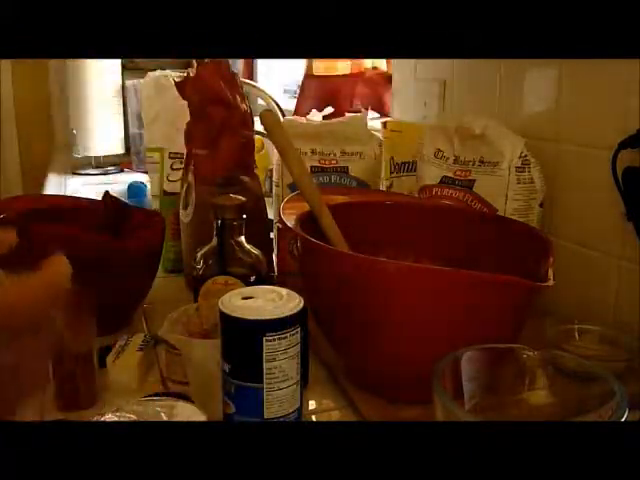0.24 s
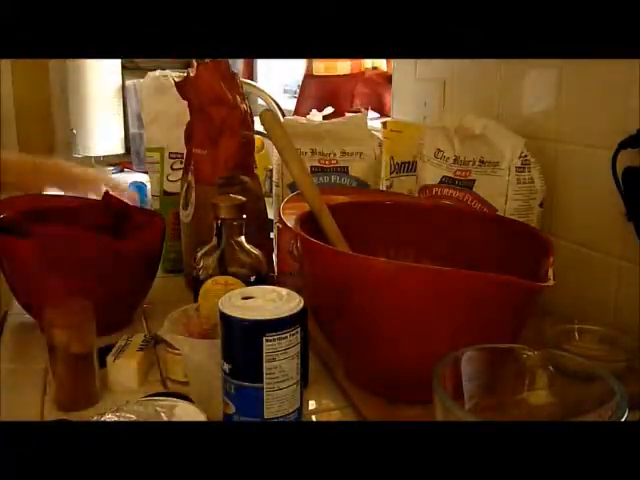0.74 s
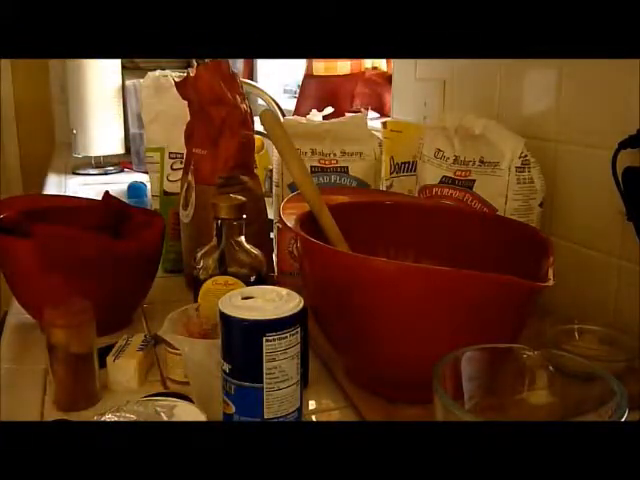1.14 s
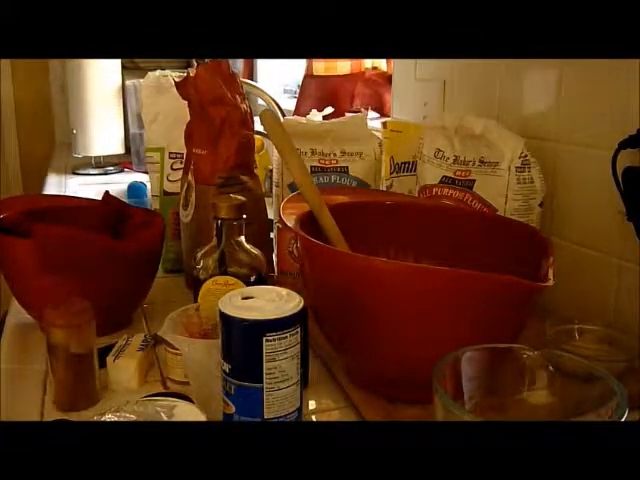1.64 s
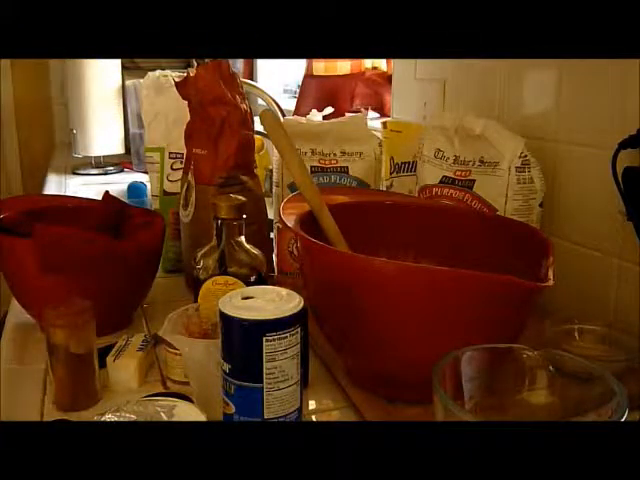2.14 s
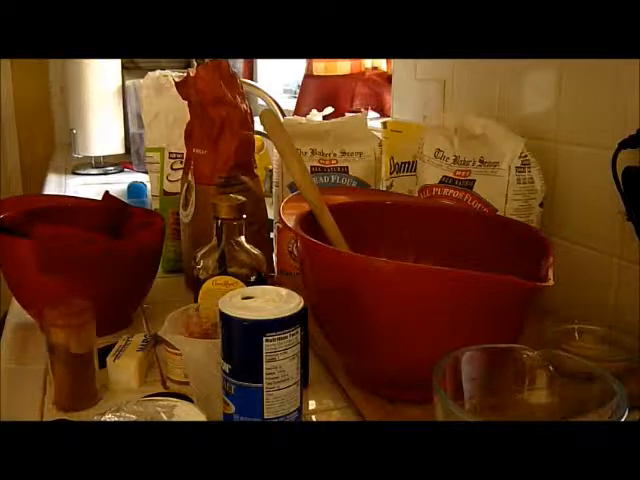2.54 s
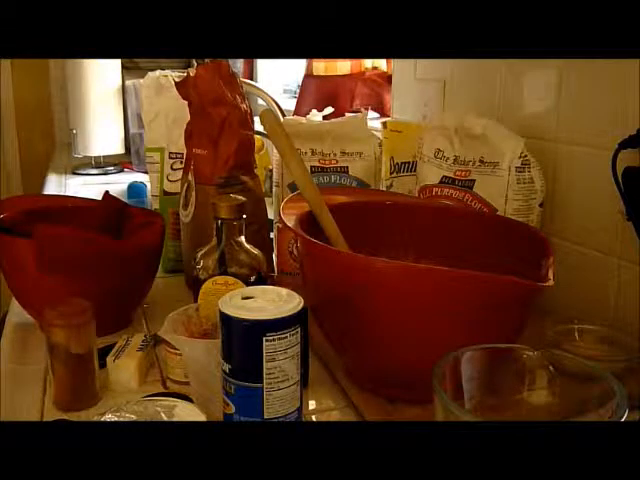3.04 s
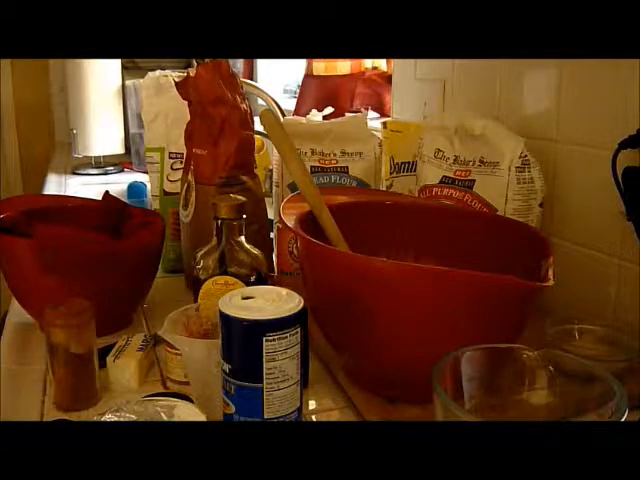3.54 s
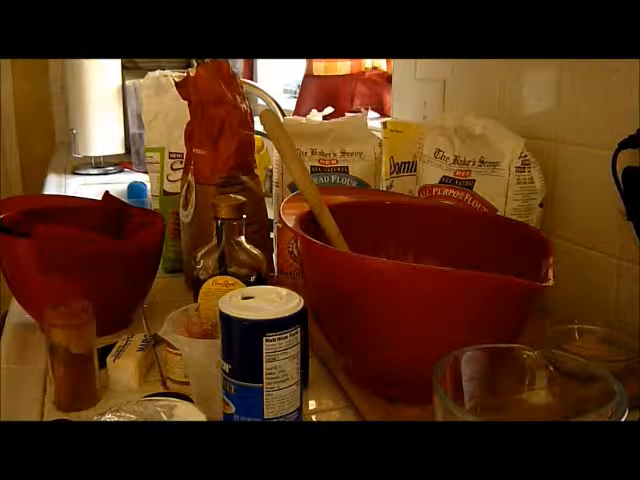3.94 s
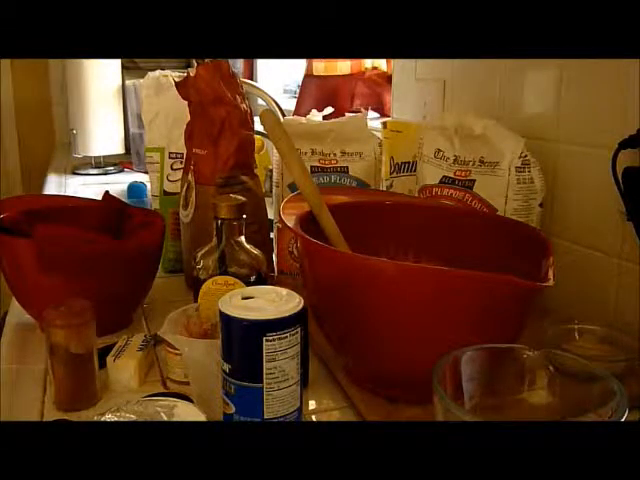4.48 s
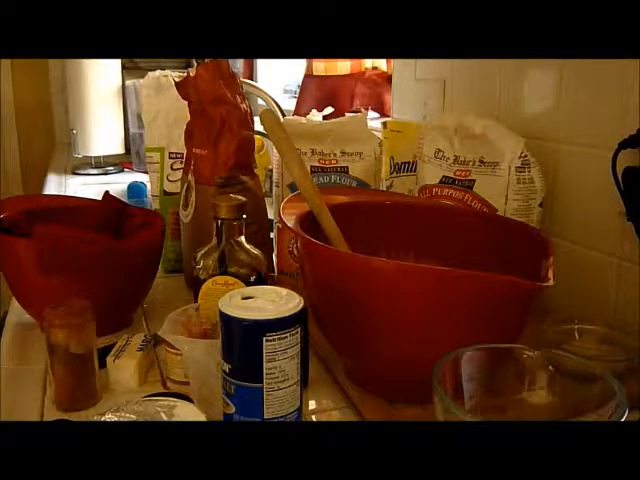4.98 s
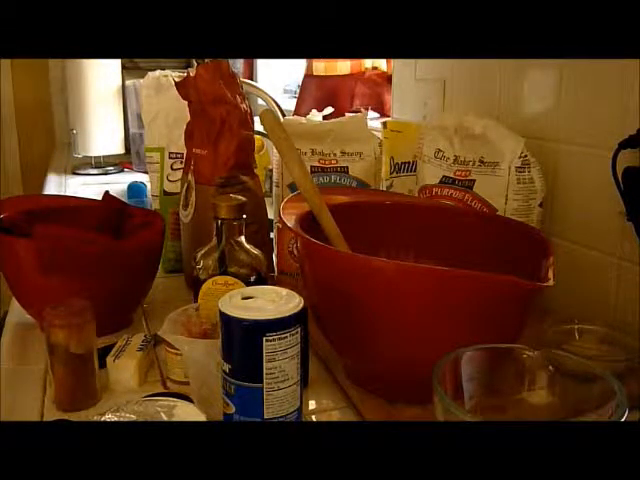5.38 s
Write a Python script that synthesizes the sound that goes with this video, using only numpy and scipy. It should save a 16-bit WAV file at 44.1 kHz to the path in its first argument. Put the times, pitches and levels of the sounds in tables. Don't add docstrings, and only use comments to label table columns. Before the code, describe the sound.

In a small tiled kitchen, a microwave door latch snaps open with a sharp rattling clack. Soft hinge bumps follow, then a bowl knocks the oven wall and the glass turntable is nudged and scraped. After a quiet pause the door slams shut with a hollow metallic thud. The oven is some way off, with short hard-walled echo; faint ticks and cloth sit near the microphone over steady hiss and fridge hum.

```python
import sys
import numpy as np
from scipy import signal
from scipy.fft import rfft, irfft
from scipy.io import wavfile
from scipy.ndimage import uniform_filter1d

SR = 44100
rng = np.random.default_rng(int(sys.argv[2]) if len(sys.argv) > 2 else 0)


def bounce(signal):
    frames = np.transpose(np.atleast_2d(signal))
    limited = np.clip(frames, -1, 1)
    pcm = np.round(limited * 32767).astype(np.int16)
    wavfile.write(sys.argv[1], SR, pcm)


def makeup_ratio(level_db):
    decades = np.asarray(level_db, float) / 20
    return 10 ** decades


N = 247489
TIME = np.arange(N) / SR
SNAP_RISE, KNOCK_RISE, RUB_RISE = 0.13, 0.25, 0.47

# t/s, level/dB, die-away/ms
LATCH_HITS = [
    (.679, -10.5, 6.6),
    (.686, -10.5, 22.5),
    (.702, -24, 25),
    (.728, -20.5, 6.0),
    (.761, -18, 24),
    (.7665, -16, 8.4),
    (.782, -22.5, 32),
]
# f/Hz, level/dB (per Hz)
LATCH_COLOUR = [(60, -70), (125, -48), (170, -22), (400, -46), (1200, -20.5), (1900, -5), (2180, -23.5),
                (2900, 2.5), (3330, -13.5), (4300, -9.5), (4900, -20.5), (7400, -23), (8000, -15),
                (10000, -67.5)]
# f/Hz, width/Hz, level/dB
LATCH_PEAKS = [(1760, 260, -13), (3166, 140, -4.5), (4200, 280, -13.5)]
# f/Hz, level/dB (per Hz)
SPRING_COLOUR = [(110, -61), (200, -40), (500, -10), (1200, -25.5), (1800, -4.5), (2800, -2.5),
                 (4300, -4.5), (5000, -18.5), (8000, -15), (10000, -78)]
# f/Hz, width/Hz, level/dB
SPRING_PEAKS = [(1600, 120, -7), (1880, 160, -1), (2680, 260, -1), (3150, 240, -4), (3850, 200, -3),
                (4400, 300, -6)]


def latch():
    spring_return_s = 0.75
    force = rattle(LATCH_HITS, SNAP_RISE, 7000, 0.71, -5.5)
    hooks_free = force * (TIME < spring_return_s)
    lever_back = force * (TIME >= spring_return_s)
    snap = signal.oaconvolve(hooks_free, body(LATCH_COLOUR, LATCH_PEAKS, -2.0))
    back = signal.oaconvolve(lever_back, body(SPRING_COLOUR, SPRING_PEAKS, -4.4))
    return (snap + back)[:N]


# t/s, level/dB, die-away/ms
HOOK_SLIDE = [
    (4.966, -18, 25.4),
    (4.999, -22, 25.2),
]
# f/Hz, level/dB (per Hz)
HOOK_COLOUR = [(60, -51), (110, -13), (300, -11), (520, -2), (900, -8.5), (1300, -6), (2000, -12),
               (3800, -14), (6800, -22.5), (8000, -23), (10000, -81)]
# t/s, level/dB, die-away/ms
DOOR_SLAM = [
    (5.0195, -5.5, 5.5),
    (5.025, -7, 7.5),
    (5.036, -16.5, 21),
    (5.065, -20.5, 54),
]
# f/Hz, level/dB (per Hz)
SLAM_COLOUR = [(40, -16.5), (120, -31), (200, -2), (300, -1), (450, -7), (650, -2), (1000, -10.5),
               (1700, -12), (3000, -18.5), (4900, -22), (6500, -25.5), (8000, -30.5), (10000, -83.5)]
# f/Hz, width/Hz, level/dB
SLAM_PEAKS = [(141, 10.4, 8), (225, 7.7, -5), (275, 12, -12), (312.7, 16, -3), (324, 29, -1),
              (413, 13, 5.5), (443, 4.6, 6), (504, 18, 1.5), (554, 11, 3), (633, 35, 6), (794, 17, -12),
              (871, 23, 1), (1080, 22, -13)]


def door_slam():
    hooks = struck(HOOK_SLIDE, KNOCK_RISE, coloured(HOOK_COLOUR), 8000, 0.94)
    slam = struck(DOOR_SLAM, SNAP_RISE, body(SLAM_COLOUR, SLAM_PEAKS, -6.0), 12000, 0.2)
    return hooks + slam


# t/s, level/dB, die-away/ms
DOOR_SWING = [
    (2.025, -37, 25.0),
    (2.362, -34, 29.8),
]
# f/Hz, level/dB (per Hz)
SWING_COLOUR = [(35, -39), (60, -13), (361, 0.5), (574, -7), (665, -38), (831, -24), (5000, -27.5),
                (6500, -60), (11000, -120)]
# f/Hz, width/Hz, level/dB
SWING_PEAKS = [(374, 59, -6), (850, 23, -14)]
# t/s, level/dB, die-away/ms
DOOR_STOP = [
    (2.085, -30.5, 22),
    (2.13, -40, 9.1),
]
# f/Hz, level/dB (per Hz)
STOP_COLOUR = [(47, -34), (80, 2), (196, -1), (241, -25), (308, -12), (663, -6.5), (1180, -21), (1450, -20),
               (7000, -29.5), (9100, -61), (15400, -120)]
# f/Hz, width/Hz, level/dB
STOP_PEAKS = [(420, 22, -18), (682, 140, 1), (2340, 81, -23), (4240, 35, -26), (4700, 47, -19)]


def door_swing():
    swing = struck(DOOR_SWING, KNOCK_RISE, body(SWING_COLOUR, SWING_PEAKS, -7.0), 9000, 1.2)
    stop = struck(DOOR_STOP, KNOCK_RISE, body(STOP_COLOUR, STOP_PEAKS, 1.5), 4900, 1.5)
    return swing + stop


# t/s, level/dB, die-away/ms
BOWL_KNOCKS = [
    (2.431, -31.5, 16),
    (2.444, -23.5, 38),
    (2.464, -19.5, 20.5),
    (2.482, -18, 18),
    (2.506, -23.5, 24),
]
# f/Hz, level/dB (per Hz)
BOWL_COLOUR = [(60, -39.5), (120, -8), (350, -16), (520, -4.5), (950, -12.5), (1400, -7.5), (1950, -12.5),
               (2700, -17.5), (4500, -22.5), (8000, -26), (10000, -72)]
# f/Hz, width/Hz, level/dB
BOWL_PEAKS = [(522, 60, -5), (678, 50, -8), (850, 60, -7), (1180, 80, -7), (1400, 90, 4), (2660, 200, -8),
              (4480, 200, -17)]
# t/s, level/dB, die-away/ms
BOWL_TAP = [
    (3.9115, -34, 7.2),
    (3.92, -36.5, 33),
]
# f/Hz, level/dB (per Hz)
TAP_COLOUR = [(180, -36), (300, -22), (459, -15), (852, -4.5), (2450, -12.5), (4370, -11), (7170, -17.5),
              (8000, -16), (10400, -57), (17600, -120)]
# t/s, level/dB, die-away/ms
BOWL_SETTLE = [
    (2.775, -38, 12),
    (2.845, -36.5, 22),
]
# f/Hz, level/dB (per Hz)
SETTLE_COLOUR = [(120, -24), (200, -1), (635, 5), (1150, -9), (1400, -9), (1610, -8), (3000, -21),
                 (3900, -49), (6600, -120)]


def bowl():
    knocks = struck(BOWL_KNOCKS, KNOCK_RISE, body(BOWL_COLOUR, BOWL_PEAKS, -11.0), 10000, 0.55)
    tap = struck(BOWL_TAP, SNAP_RISE, coloured(TAP_COLOUR), 9000, 1.0)
    settle = struck(BOWL_SETTLE, RUB_RISE, coloured(SETTLE_COLOUR), 5000, 3.4)
    return knocks + tap + settle


# t/s, level/dB, die-away/ms
PLATE_NUDGES = [
    (3.312, -30.5, 31),
    (3.40, -52, 8.9),
]
# f/Hz, level/dB (per Hz)
NUDGE_COLOUR = [(71, -48), (120, -15), (402, 4.5), (692, -4.5), (1110, -3), (2060, -33.5), (5810, -33),
                (7000, -39), (9100, -62), (15400, -120)]
# f/Hz, width/Hz, level/dB
NUDGE_PEAKS = [(410, 23, 0), (1096, 23, -0.5), (1230, 70, -2), (1700, 26, -14), (2440, 57, -16),
               (2890, 44, -14.5)]
# t/s, level/dB, die-away/ms
PLATE_SHIFT = [
    (3.49, -31.5, 28),
    (3.522, -42, 11.5),
]
# f/Hz, level/dB (per Hz)
SHIFT_COLOUR = [(88, -47), (150, -23), (278, -20), (403, 6), (574, -28), (1130, -4.5), (6000, -48),
                (7800, -76), (13200, -120)]
# f/Hz, width/Hz, level/dB
SHIFT_PEAKS = [(408, 16, -3), (640, 12, -12.5), (880, 21, -11.5), (1170, 68, -26), (1710, 43, -16),
               (2130, 36, -16), (2835, 47, -17.5)]
# t/s, level/dB, die-away/ms
PLATE_DRAG = [
    (3.66, -37.5, 43),
    (3.705, -25.5, 22.3),
    (3.725, -24.5, 17),
    (3.745, -29, 12),
    (3.77, -20, 11.7),
    (3.812, -39, 10),
]
# f/Hz, level/dB (per Hz)
DRAG_COLOUR = [(120, -61), (200, -14), (396, -11.5), (957, -14), (1090, 6), (1330, -20), (1840, -8),
               (6000, -88), (7800, -81), (13200, -120)]
# f/Hz, width/Hz, level/dB
PLATE_PEAKS = [(403, 8.7, 6.5), (531.5, 6.3, 1.5), (662, 11, -3), (780, 79, 1.5), (1074, 28, -6),
               (1114, 44, 0), (1670, 46, -20), (1830, 18, 2), (2650, 98, -8), (3780, 43, -16.5),
               (3900, 60, -38), (5100, 90, -26)]


def turntable():
    nudge = struck(PLATE_NUDGES, RUB_RISE, body(NUDGE_COLOUR, NUDGE_PEAKS, 3.9), 6000, 2.1)
    shift = struck(PLATE_SHIFT, RUB_RISE, body(SHIFT_COLOUR, SHIFT_PEAKS, 2.1), 7200, 6.6)
    drag = struck(PLATE_DRAG, RUB_RISE, body(DRAG_COLOUR, PLATE_PEAKS, 1.9), 6000, 3.0)
    return nudge + shift + drag


# (t/s, level/dB)
CASE_NOTES = [
    (58, 0.19, [(5.02, -24)]),
    (75, 0.25, [(5.02, -25)]),
    (101.5, 0.28, [(2.025, -40), (2.365, -44), (2.437, -27.5), (5.015, -20)]),
    (174.8, 0.39, [(.679, -31.5), (3.31, -41.5), (5.065, -22)]),
    (276, 0.37, [(2.49, -33)]),
    (322.3, 0.37, [(.765, -37.5), (5.022, -26)]),
    (665, 0.22, [(2.088, -33.5)]),
    (662, .9, [(.83, -38)]),
    (680, .6, [(.86, -43)]),
    (1447, 0.2, [(2.478, -33), (2.56, -29.5)]),
]


def case_ringing():
    return ringing_tones(CASE_NOTES)


# (t/s, level/dB)
GLASS_NOTES = [(402, 0.17, [(3.517, -31.5), (3.735, -32)]), (805, 0.26, [(3.707, -34)]),
               (1560, 0.088, [(.293, -47), (.35, -46)]), (1660, 0.064, [(.324, -44)]),
               (1760, 0.15, [(3.335, -43.5)]), (1885, 0.35, [(3.712, -36.5), (3.76, -49)]),
               (2740, 0.17, [(3.715, -50.5), (3.765, -56)]), (3140, .18, [(3.315, -51), (3.39, -60)]),
               (3760, 0.2, [(3.48, -61), (3.725, -57), (3.77, -51)]), (4770, .12, [(2.088, -62)]),
               (5170, 0.21, [(3.725, -62), (3.77, -61)]), (5640, 0.11, [(3.317, -48)])]


def glass_ringing():
    return ringing_tones(GLASS_NOTES)


# t/s, level/dB
COUNTER_TICKS = [(0.2757, -44.5), (0.2844, -43), (0.3054, -45), (0.3284, -42), (0.4774, -45), (1.264, -48),
                 (1.335, -46), (1.3554, -45), (2.385, -42), (4.998, -26), (5.4705, -48)]
# f/Hz, level/dB (per Hz)
TICK_COLOUR = [(500, -33), (1600, 6), (3500, -2), (7000, 2.5), (9000, -9.5)]
# t/s, level/dB, die-away/ms
SLEEVE_BRUSHES = [
    (.56, -43, 48),
    (1.56, -46, 72),
    (1.84, -44.5, 65),
    (1.97, -45.5, 14),
]
# f/Hz, level/dB (per Hz)
SLEEVE_COLOUR = [(600, -4), (1600, 13.5), (3000, 5.5), (6500, 3.5), (9000, -24)]


def counter():
    tick_ms = 2.5
    hits = [(s, db, tick_ms) for s, db in COUNTER_TICKS]
    ticks = struck(hits, SNAP_RISE, coloured(TICK_COLOUR), 9000, 2.7, trim_db=-3.0)
    sleeves = struck(SLEEVE_BRUSHES, RUB_RISE, coloured(SLEEVE_COLOUR), 11000, 2.7)
    return ticks + sleeves


# f/Hz, time to fall 60 dB/s
KITCHEN_T60 = [(60, 0.75), (180, 0.44), (400, 0.55), (1000, 0.69), (3000, 0.59), (8000, 0.46)]


def kitchen(x):
    t = TIME[:SR]
    edges = 30 * 2 ** np.arange(0, 8.6, 0.5)
    white = rng.standard_normal((2, SR))
    tail = np.zeros(SR)
    for k, (low, high) in enumerate(zip(edges, edges[1:])):
        band = signal.butter(2, [low, high], "band", fs=SR, output="sos")
        t60 = at_hz(KITCHEN_T60, np.sqrt(low * high))
        tail += signal.sosfilt(band, white[k % 2]) * makeup_ratio(-60 * t / t60)
    spectrum = rfft(tail, 2 * SR)
    power = uniform_filter1d(np.abs(spectrum) ** 2, size=160)
    even = np.sqrt(at_hz(KITCHEN_T60, np.arange(SR + 1) / 2) / power)
    tail = irfft(spectrum * even)[:SR]
    tail *= 1 - np.exp(-(t / 0.014) ** 2)
    return signal.fftconvolve(x, tail / np.linalg.norm(tail))[:N]


# f/Hz, level/dB (per Hz)
ROOM_TONE = [(15, -59.5), (30, -34), (60, -27.5), (100, -22), (160, -19), (190, -20), (214, -14.5),
             (242, -19), (308, -16.5), (475, -20.5), (1220, -26.5), (1840, -31), (6600, -38.5), (8000, -36)]
# f/Hz, level/dB
FRIDGE_LINES = [(36.7, -118), (219, -65), (308, -64.5)]


def room_tone():
    size = 16384
    white = rng.standard_normal(N + size)
    hiss = signal.fftconvolve(white, coloured(ROOM_TONE, size=size))[size:size + N]
    hum = sum(makeup_ratio(db) * np.sqrt(2) * np.sin(2 * np.pi * hz * TIME) for hz, db in FRIDGE_LINES)
    return makeup_ratio(-50) * hiss + hum


def struck(hits, rise, response, per_s, spread_db, trim_db=-3.5):
    return signal.oaconvolve(rattle(hits, rise, per_s, spread_db, trim_db), response)[:N]


def rattle(hits, rise, per_s, spread_db, trim_db):
    force, ms = np.zeros(N), TIME[:SR // 4] * 1000
    for s, db, die_ms in hits:
        shape = (1 - np.exp(-ms / (rise * die_ms))) * np.exp(-ms / die_ms)
        start = round(s * SR)
        force[start:start + len(ms)] += makeup_ratio(db + trim_db) * shape[:N - start]
    chance = rng.random((3, N))
    strength = makeup_ratio(spread_db * np.minimum(-np.log(chance[0] + 1e-9), 3))
    direction = np.sign(chance[1] - 0.5)
    impacts = strength * direction * (chance[2] < per_s / SR)
    return force * impacts / np.sqrt(np.mean(impacts ** 2) + 1e-20)


def body(spectrum, peaks, ring_db):
    t = TIME[:8192]
    modes = np.zeros(len(t))
    for hz, width, db in peaks:
        decay = np.exp(-np.pi * width * t)
        modes += makeup_ratio(db) * np.sqrt(width) * decay * np.sin(2 * np.pi * hz * t)
    response = makeup_ratio(ring_db) * modes / np.linalg.norm(modes)
    response[:4096] += coloured(spectrum)
    return response / np.linalg.norm(response)


def coloured(spectrum, size=4096):
    log_level = at_hz(spectrum, np.fft.rfftfreq(size, 1 / SR)) * np.log(10) / 20
    cepstrum = irfft(log_level)
    cepstrum[1:size // 2] *= 2
    cepstrum[size // 2 + 1:] = 0
    response = irfft(np.exp(rfft(cepstrum)))
    return response / np.linalg.norm(response)


def at_hz(points, hz):
    table_hz, values = np.array(points).T
    return np.interp(np.log(hz + 1), np.log(table_hz), values)


def ringing_tones(table):
    out, t = np.zeros(N + SR), TIME[:SR]
    for hz, t60, blows in table:
        swell = 1 - np.exp(-(t / (0.037 * t60)) ** 2)
        note = swell * makeup_ratio(-60 * t / t60) * np.sin(2 * np.pi * hz * t)
        for s, db in blows:
            start = round(s * SR)
            out[start:start + SR] += makeup_ratio(db) * note
    return out[:N]


def scene():
    thin = signal.butter(3, 115, "high", fs=SR, output="sos")
    blows = signal.sosfilt(thin, latch() + door_slam() + door_swing() + bowl())
    glass = signal.sosfilt(thin, turntable())
    echo = kitchen(makeup_ratio(-4.5) * blows + makeup_ratio(-6.5) * glass)
    ringing = case_ringing() + glass_ringing()
    return (makeup_ratio(2.5) * blows + glass + echo + counter() + ringing + room_tone())[None]


def roll_off(x):
    return signal.sosfilt(signal.butter(12, 8150, fs=SR, output="sos"), x)


def record(dry):
    top, cutoff_hz, offset = 0.8, 8400, -0.0667
    rounded = top * np.tanh(dry / top)
    top_cut = signal.cheby2(11, 48, cutoff_hz, fs=SR, output="sos")
    mix = signal.sosfilt(top_cut, rounded) + offset
    return roll_off(mix)


dry = scene()
out = record(dry)
bounce(out)
```